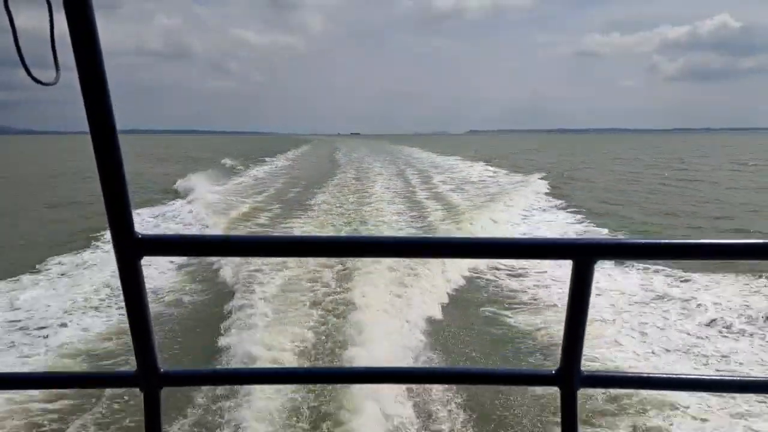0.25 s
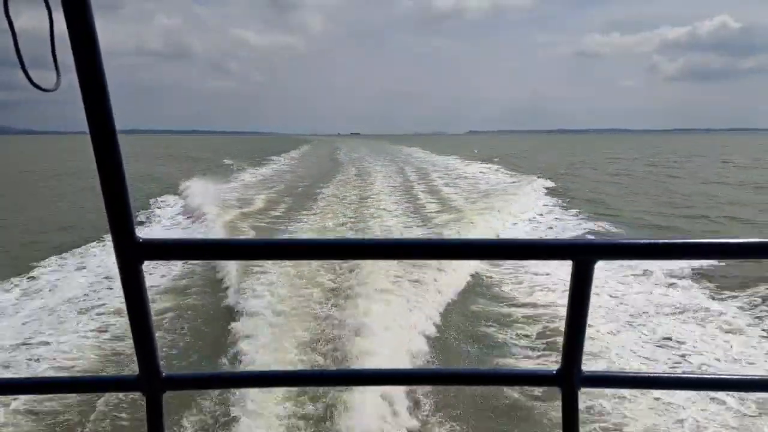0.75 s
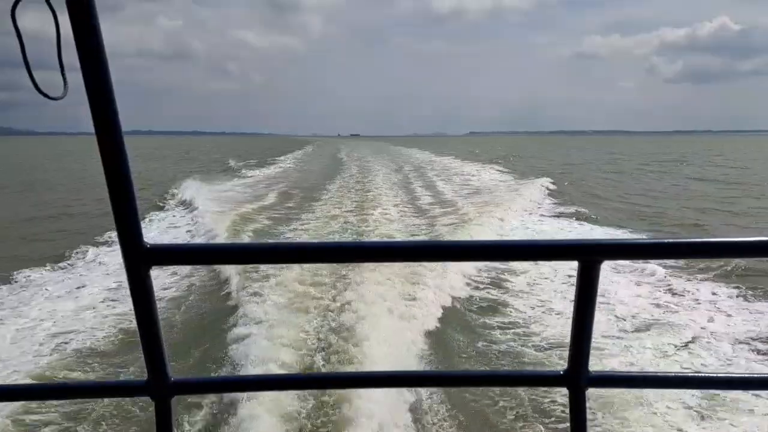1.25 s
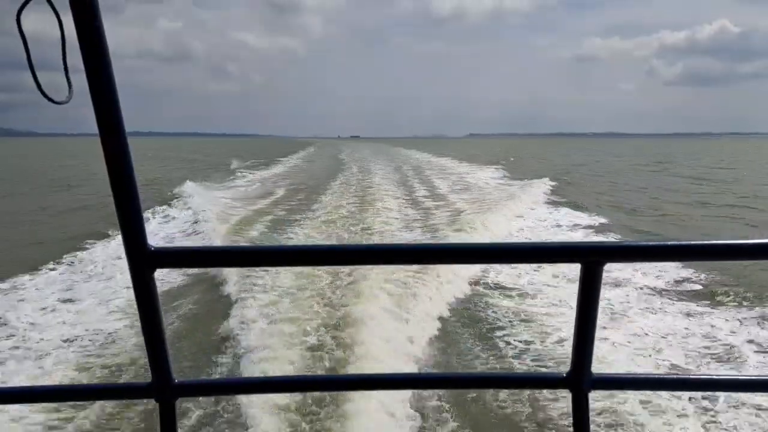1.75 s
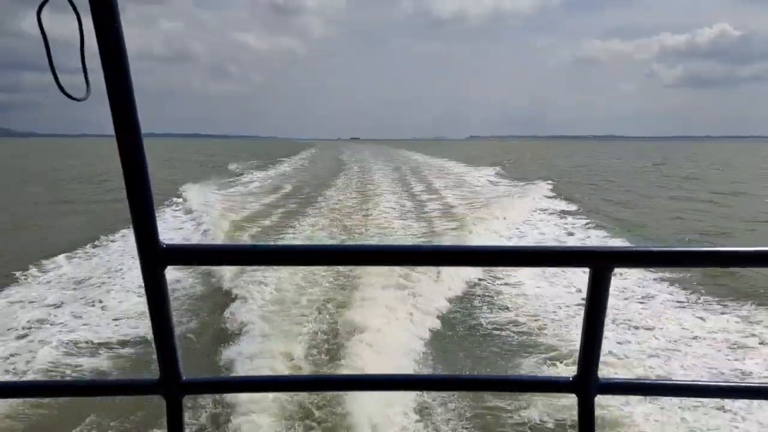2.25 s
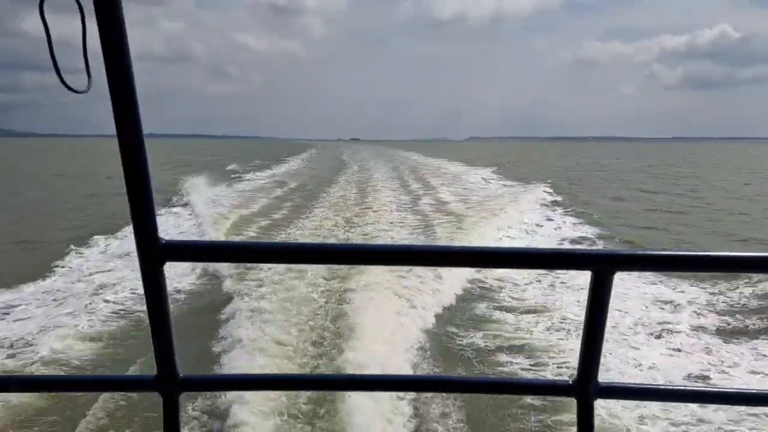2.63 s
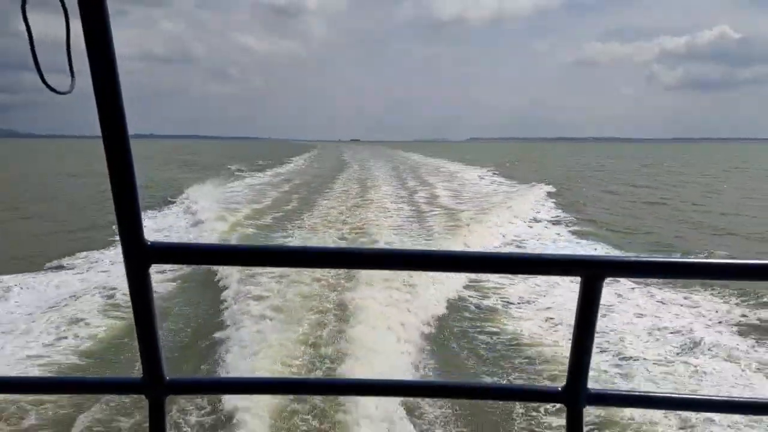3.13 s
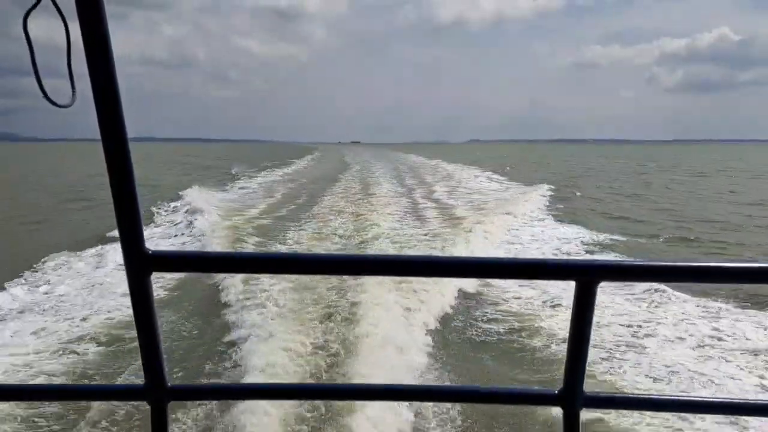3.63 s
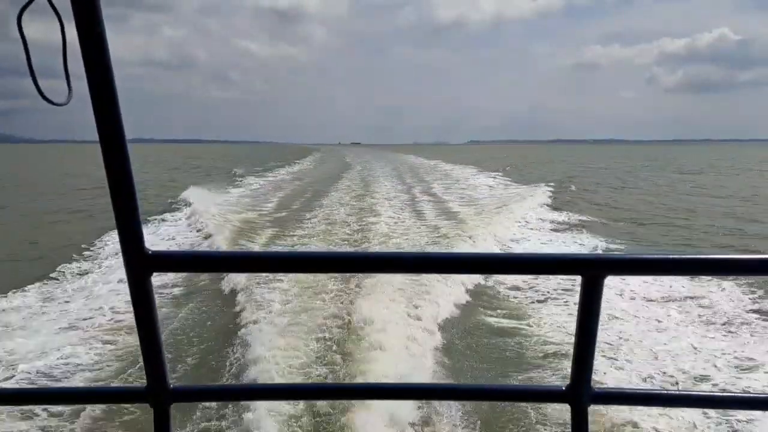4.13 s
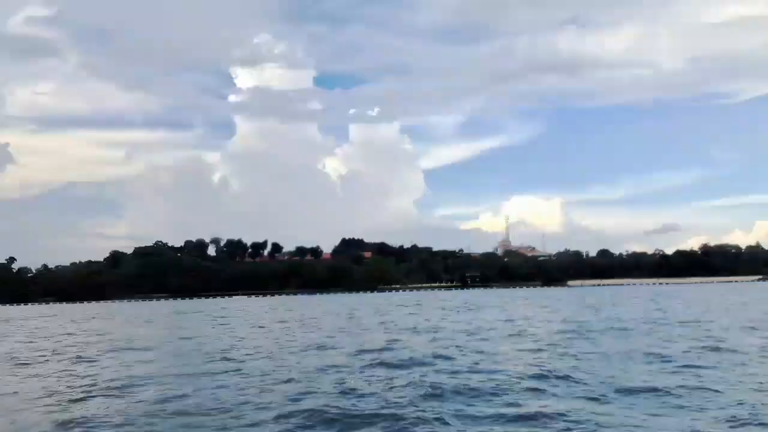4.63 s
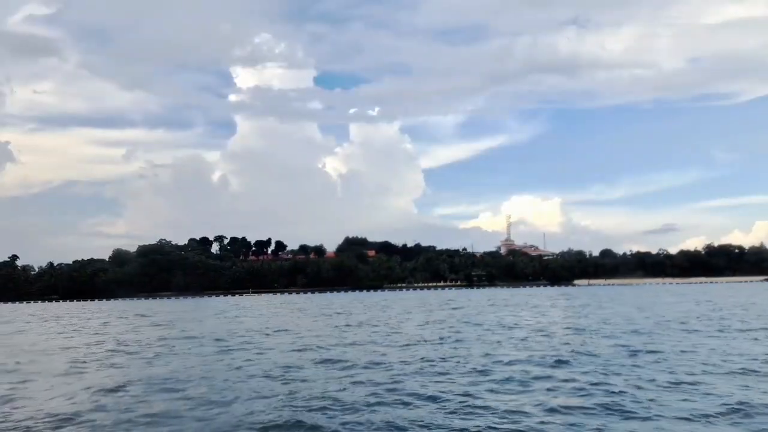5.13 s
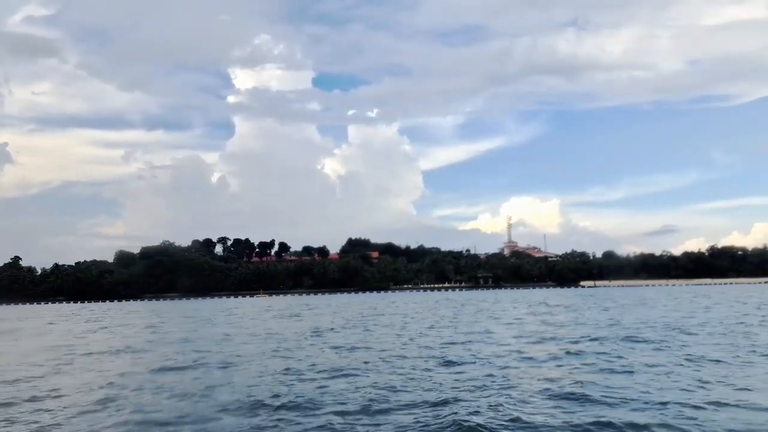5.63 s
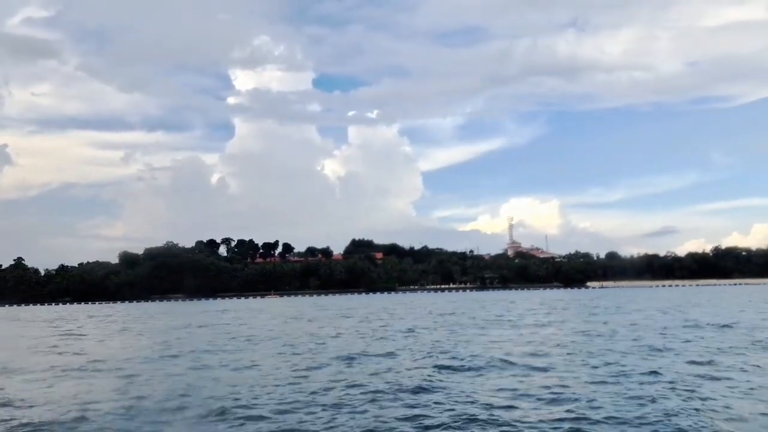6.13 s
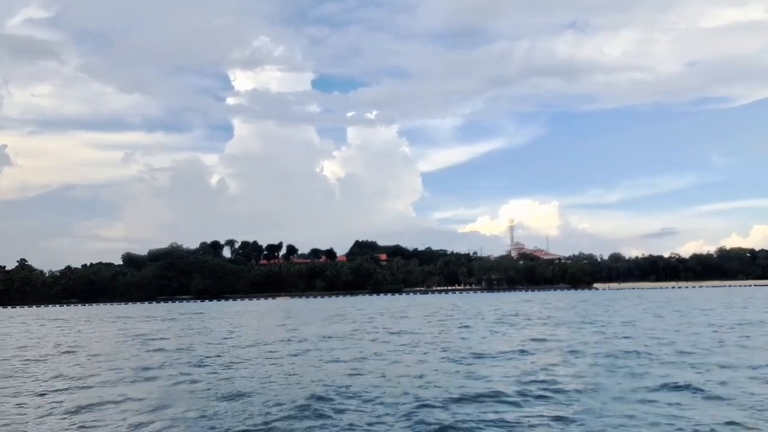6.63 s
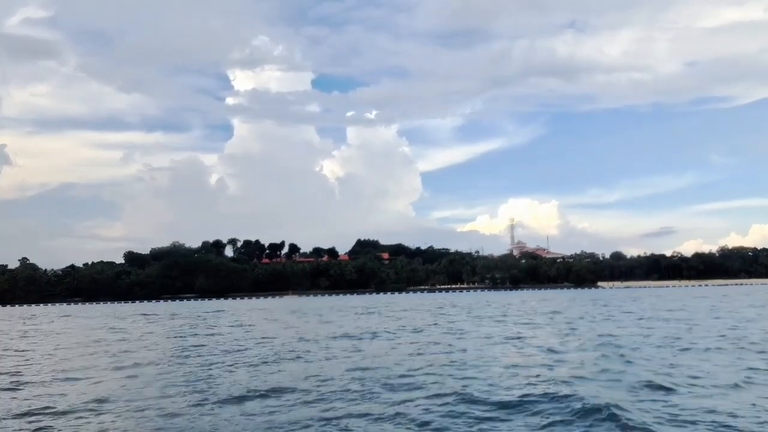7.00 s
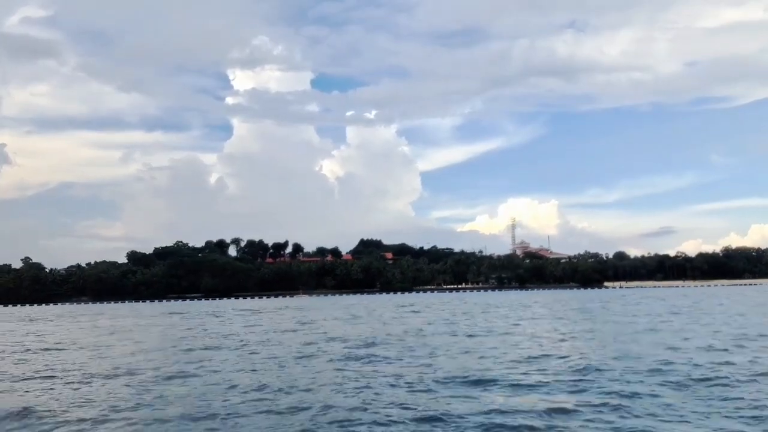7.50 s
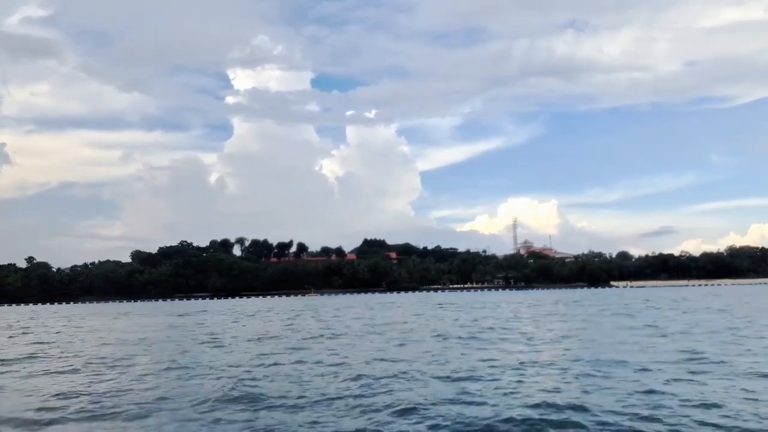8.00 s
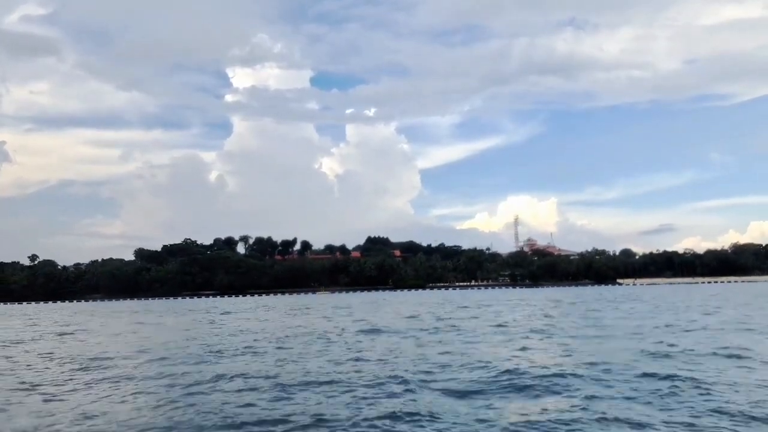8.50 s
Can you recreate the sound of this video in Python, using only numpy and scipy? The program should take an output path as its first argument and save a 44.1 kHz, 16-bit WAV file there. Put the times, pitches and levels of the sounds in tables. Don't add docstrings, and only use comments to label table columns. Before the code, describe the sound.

On an open deck, heavy engines pulse over churning wake, cut out briefly, then a barking exhaust drones on with gentle waves, drips and squeaks.

```python
import sys
import numpy as np
from scipy import signal
from scipy.fft import rfft, irfft, next_fast_len
from scipy.io import wavfile
from scipy.ndimage import uniform_filter1d, map_coordinates

SR = 44100
rng = np.random.default_rng(int(sys.argv[2]) if len(sys.argv) > 2 else 0)


def bounce(signal):
    frames = np.transpose(np.atleast_2d(signal))
    limited = np.clip(frames, -1, 1)
    pcm = np.round(limited * 32767).astype(np.int16)
    wavfile.write(sys.argv[1], SR, pcm)


def field_ratio(decibels):
    return 10 ** (np.asarray(decibels, dtype=float) / 20)


N = 385875


def unit(x):
    return x / np.sqrt(np.mean(x ** 2) + 1e-20)


def along(points, hz):
    f, v = np.transpose(points)
    return np.interp(np.log(hz + 1), np.log(f + 1), v)


def wobble(rate):
    knots = rng.standard_normal(int(N * rate / SR) + 4)
    return map_coordinates(knots, [np.arange(N) * rate / SR])


def swell(s, length):
    return np.sin(np.pi * np.clip((np.arange(N) / SR - s) / length, 0, 1)) ** 2


def filtered(x, response):
    m = next_fast_len(N + 8192)
    return irfft(rfft(x, m) * response(np.fft.rfftfreq(m, 1 / SR)), m)[..., :N]


def tilted(x, tilt):
    return filtered(x, lambda hz: field_ratio(np.outer([.5, -.5], along(tilt, hz))))


def rush(spectrum, alike, patchy_db):
    z = signal.stft(rng.standard_normal((2, N)), nperseg=512)[2]
    field = uniform_filter1d(rng.standard_normal(z.shape[1:]), size=8, axis=0)
    field = uniform_filter1d(field, size=10, axis=1)
    pair = signal.istft(z * field_ratio(patchy_db * unit(field)), nperseg=512)[1][:, :N]

    def mid_and_side(hz):
        turn = np.arccos(np.clip(along(alike, hz), -1, 1)) / 2
        return field_ratio(along(spectrum, hz)) * [np.cos(turn), np.sin(turn)]

    mid, side = filtered(pair, mid_and_side)
    return unit(np.array([mid + side, mid - side]))


def narrow(hz, width_hz):
    return unit(filtered(rng.standard_normal(N), lambda f: np.exp(-((f - hz) / width_hz) ** 2)))


def spray(level_db, surge, spectrum, alike, tilt):
    flicker_db = 0.26 * surge + 0.2 * wobble(25)
    return tilted(field_ratio(level_db + 3.5 + flicker_db) * rush(spectrum, alike, patchy_db=0.8), tilt)


def hull_roar(level_db, surge, spectrum, alike, tilt):
    return tilted(field_ratio(level_db + 0.44 * surge) * rush(spectrum, alike, patchy_db=1.0), tilt)


def exhaust_rumble(load, spectrum, alike, tilt):
    power = np.sum(field_ratio(2 * along(spectrum, np.arange(10, 1400))))
    level = load * field_ratio(10 * np.log10(power) + 1.5 * wobble(3.3))
    return tilted(level * rush(spectrum, alike, patchy_db=1.5), tilt)


def whine(tones):
    total = 0
    for hz, width, db in tones:
        pair = np.array([narrow(hz, width), narrow(hz, width)])
        total = total + field_ratio(db + 2.5 * wobble(1.9)) * pair
    return total


# (t/s, length/s, level/dB)
DRIPS = [
    (4.917, .12, -76),
    (6.229, .04, -67),
    (6.453, 0.066, -74),
    (6.94, 0.14, -64),
    (7.157, .045, -64),
    (8.319, .05, -66),
    (8.37, .08, -69),
    (8.612, 0.03, -64),
]
# (f/Hz, level/dB per Hz)
WET_DECK = [(3000, -55), (7000, -9), (9000, -0.5), (13000, -7.5), (16000, -13)]


def spatter():
    drops = sum(field_ratio(db) * swell(s, length) for s, length, db in DRIPS)
    return drops * field_ratio(5 * wobble(300)) * rush(WET_DECK, [(5000, .1)], patchy_db=0)


# (t/s, length/s, f/Hz, width/Hz, level/dB)
SQUEAKS = [
    (5.55, .15, 10300, 300, -76),
    (7.33, .3, 10250, 250, -73),
    (7.84, .33, 10300, 300, -73),
    (7.72, .5, 1765, 8, -57),
]


def squeaking_fitting():
    return sum(field_ratio(db) * swell(s, length) * narrow(hz, width) for s, length, hz, width, db in SQUEAKS)


def diesel(hz, wander, orders, in_step, pipe, flutter_db):
    crank = hz * (np.arange(N) / SR - in_step) + wander * wobble(1.5)
    total = 0
    for k, db in orders:
        level = np.sqrt(2) * field_ratio(db + flutter_db * wobble(4))
        total = total + level * np.sin(2 * np.pi * (k * crank + pipe[int(k)]))
    return total


# (engine cycles f/Hz, crank wander/cycles, [(multiple of the cycle, level/dB)])
STERN_DIESELS = [
    (15.362, 0.0028, [(3, -38), (4, -36.5), (6, -20), (7, -37.5), (8, -55.5), (9, -21.3), (10, -38), (11, -35), (12, -36), (13, -58.5), (14, -46.5), (15, -51.5), (28, -56)]),
    (13.588, 0.0035, [(3, -30.5), (5, -40), (6, -20), (9, -28), (11, -31.5), (14, -43), (15, -43.5), (18, -43.5), (21, -49.5), (27, -46.5)]),
    (15.501, .004, [(6, -26), (8, -33.3), (9, -25), (14, -53), (18, -48.5), (20, -45)]),
    (15.134, 0.011, [(2, -38), (5, -36), (6, -29), (7, -30), (13, -52.5)]),
]
# (shaft turns f/Hz, level/dB)
BLADES = [
    (15.362, -31.5),
    (15.501, -29.5),
]


def stern_engines():
    pipe = rng.random(64)
    engines = sum(diesel(*row, 2.139, pipe, flutter_db=1.5) for row in STERN_DIESELS)
    blades = sum(diesel(hz, 0.012, [(3, db)], 1.62, pipe, flutter_db=1.0) for hz, db in BLADES)
    return engines + blades


RAIL_IN_STEP, NEAR_HZ = 6.29, 17.356
# (engine cycles f/Hz, crank wander/cycles, [(multiple of the cycle, level/dB)])
RAIL_DIESELS = [
    (10.82, 0.0024, [(4, -40), (5, -37.5), (6, -17.5), (9, -24.5), (10, -33.5), (12, -26), (13, -45), (14, -26.5), (16, -35.5), (17, -43.5), (18, -36), (19, -43.5), (20, -43), (21, -54.5), (22, -46)]),
    (12.267, 0.0031, [(3, -32.5), (6, -21.5), (7, -40), (9, -27), (11, -36.5), (12, -36.5), (14, -41.5), (22, -47.5), (24, -47), (28, -50)]),
]
# (multiple of the cycle, level/dB)
NEAR_LOW = [(6, -24), (9, -20.5), (12, -46)]


def rail_engines(pipe):
    engines = sum(diesel(*row, RAIL_IN_STEP, pipe, flutter_db=.8) for row in RAIL_DIESELS)
    return engines + diesel(NEAR_HZ, 0.023, NEAR_LOW, RAIL_IN_STEP, pipe, flutter_db=2.5)


# (multiple of the cycle, level/dB over the bark)
NEAR_BARK = [(15, -6), (18, -1.5), (21, -3), (24, -17), (26.7, -12), (27, -18), (30, -19.5), (39, -19),
             (41, -25.5), (44.7, -23)]


def exhaust_bark(level_db, pipe):
    return field_ratio(level_db - 2.2) * diesel(NEAR_HZ, .006, NEAR_BARK, RAIL_IN_STEP, pipe, flutter_db=1.5)


def panned(x, db):
    return x * field_ratio([[db / 2], [-db / 2]])


def limited(x):
    return x / (1 + np.abs(x / .98) ** 8) ** (1 / 8)


def starved(x, holes, dips, dip_db):
    frame = 1024
    hz, _, z = signal.stft(x, SR, nperseg=frame)
    draw = rng.random((len(hz) // 3 + 1, z.shape[2] // 3 + 1))
    draw = draw.repeat(3, axis=0).repeat(3, axis=1)
    draw = draw * field_ratio(2.2 * np.resize(wobble(6)[::frame // 2], draw.shape[1]))
    kept = draw[:len(hz), :z.shape[2]] > along(holes, hz)[:, None]
    x = signal.istft(z * kept, SR, nperseg=frame)[1][:, :N]

    hz, t, z = signal.stft(x, SR, nperseg=128, noverlap=96)
    frames = t * SR / frame - .74
    joint = np.round(frames).astype(int)
    struck, centre = rng.random((2, joint.max() + 2))[:, joint]
    near = np.exp(-((frames - joint) / 0.19) ** 2) * (struck < dips)
    band = np.exp(-((hz[:, None] - 3500 - 10000 * centre) / 3200) ** 4)
    return signal.istft(z * field_ratio(dip_db * near * band), SR, nperseg=128, noverlap=96)[1][:, :N]


# (t/s, drone level/dB)
STERN_LOAD = [
    (0, -14.5),
    (.6, -16.5),
    (1.2, -12.7),
    (1.8, -13.8),
    (2.4, -14.5),
    (2.8, -13.3),
    (3.3, -11.8),
    (3.9, -14.8),
    (4.6, -14),
]
# (t/s, length/s, level/dB)
SWELLS = [
    (.2, .8, 1),
    (1.0, 1.5, 2),
    (2.8, .9, 1.8),
]


def stern_levels():
    t = np.arange(N) / SR
    load_db = np.interp(t, *np.transpose(STERN_LOAD))
    churn_db = sum(db * swell(s, length) for s, length, db in SWELLS)
    ebb_db = -4.5 * (t - 3.5).clip(0)
    roar_db = -29 + .3 * (load_db + 14) + churn_db + ebb_db
    return load_db, roar_db, -40.1 + .6 * churn_db


# (f/Hz, level/dB per Hz)
STERN_RUMBLE = [(10, -100), (20, -64.5), (28, -64.5), (40, -39), (60, -40.5), (85, -43), (120, -40),
                (170, -46.5), (240, -53), (340, -55.5), (480, -59.2), (700, -67), (1400, -110)]
STERN_ROAR = [(120, -30), (200, -3), (269, 0.5), (338, -6.5), (392, -3), (541, -13), (914, -11.5),
              (1300, -24), (1690, -48), (2860, -120)]
STERN_SPRAY = [(650, -8.5), (1100, -1.5), (1550, -3.5), (2600, -2), (2850, -7.5), (5740, -10.8),
               (8000, -16.7), (9450, -21.5), (12200, -14.8), (15600, -26.5)]
# (f/Hz, likeness -1 to 1)
STERN_ALIKE = [(60, 0.81), (130, 0.81), (290, 0.96), (640, 0.62), (1410, -0.21), (3100, 0.08),
               (6820, -0.11), (15000, 0.05)]
# (f/Hz, left minus right level/dB)
STERN_TILT = [(60, .5), (200, 2), (380, -1), (1290, -2.5), (2380, -6.5), (4400, -9), (6800, -14.5),
              (9500, -4), (15000, -3)]
# (f/Hz, width/Hz, level/dB)
STERN_TURBO = [(381, 4, -43), (7895, 15, -67), (7935, 15, -70)]
# (f/Hz, share 0-1)
STERN_HOLES = [(5000, 0), (7000, .01), (9000, .02), (13000, .005), (15500, .08)]


def stern():
    drone_db, roar_db, spray_db = stern_levels()
    load = field_ratio(drone_db + 13)
    surge = wobble(7)
    low = load * panned(stern_engines(), 0.94)
    low = low + exhaust_rumble(load, STERN_RUMBLE, STERN_ALIKE, STERN_TILT)
    low = low + hull_roar(roar_db - 3, surge, STERN_ROAR, STERN_ALIKE, STERN_TILT)
    hiss = spray(spray_db, surge, STERN_SPRAY, STERN_ALIKE, STERN_TILT)
    return starved(limited(low) + hiss + whine(STERN_TURBO), STERN_HOLES, dips=0.11, dip_db=-5.5)


# (t/s, length/s, level/dB)
RAIL_WAVES = [
    (4.88, .2, 3.5),
    (5.08, .12, -2.5),
    (5.45, .9, -2),
    (6.4, .5, 1),
    (6.95, .8, 1.5),
    (8.1, .6, 1),
]
# (t/s, length/s, level/dB)
BARK_LULL = (6.85, 1.15, -10)


def rail_levels():
    settling = np.clip(1 - (np.arange(N) / SR - 5.08) / .12, 0, 1)
    gain_db = 3.8 * settling
    settling_db = .6 * gain_db
    water_db = settling_db + sum(db * swell(s, length) for s, length, db in RAIL_WAVES)
    s, length, lull_db = BARK_LULL
    bark_db = -31 + lull_db * swell(s, length) + settling_db
    return -13.7 + gain_db, -29 + water_db, -51 + water_db, bark_db


# (f/Hz, level/dB per Hz)
RAIL_RUMBLE = [(10, -100), (20, -60), (28, -56.5), (40, -52), (60, -41.5), (85, -49), (120, -39.5),
               (170, -45.5), (240, -55), (340, -64), (480, -74), (700, -72.5), (1400, -110)]
RAIL_ROAR = [(200, -28.5), (280, -9), (310, -3), (360, -2), (385, -10), (480, -12), (550, -12.5),
             (600, -17), (700, -14.5), (860, -22), (960, -19.5), (1100, -22.5), (1700, -48), (2900, -120)]
RAIL_SPRAY = [(650, -29), (1100, -13), (1160, -11.5), (1260, 1), (1590, -0.5), (1850, -4.5), (2190, -3),
              (3560, -17), (5190, -12), (6410, -22), (7740, -18), (9450, -27.5), (10400, -25.5),
              (15600, -41.5)]
# (f/Hz, likeness -1 to 1)
RAIL_ALIKE = [(60, 0.82), (130, 0.86), (290, 0.77), (640, 0.26), (1410, -0.089), (3100, 0.011),
              (6820, -0.06), (15000, 0.17)]
# (f/Hz, left minus right level/dB)
RAIL_TILT = [(60, 3), (110, 1.0), (200, -0.5), (380, -2.5), (700, 2.5), (1290, -1.5), (2380, -8),
             (4400, -9.5), (8120, -1), (15000, 1.5)]
# (f/Hz, width/Hz, level/dB)
RAIL_TURBO = [(615, 12, -55), (810, 6, -60), (977, 5, -57), (988, 4, -56), (741, 8, -58), (1260, 25, -62),
              (5185, 12, -69), (5100, 20, -74), (4625, 25, -73)]
# (f/Hz, share 0-1)
RAIL_HOLES = [(8000, 0), (9000, .25), (11000, .25), (13500, .35), (15000, .5), (15700, .85)]


def rail():
    drone_db, roar_db, spray_db, bark_db = rail_levels()
    load = field_ratio(drone_db + 13)
    surge = wobble(7)
    pipe = rng.random(64)
    low = load * panned(rail_engines(pipe), 1.2) + exhaust_bark(bark_db, pipe)
    low = low + exhaust_rumble(load, RAIL_RUMBLE, RAIL_ALIKE, RAIL_TILT)
    low = low + hull_roar(roar_db - 4.5, surge, RAIL_ROAR, RAIL_ALIKE, RAIL_TILT)
    hiss = spray(spray_db, surge, RAIL_SPRAY, RAIL_ALIKE, RAIL_TILT)
    ship = starved(limited(low) + hiss + whine(RAIL_TURBO), RAIL_HOLES, dips=.5, dip_db=-11.5)
    return squeaking_fitting() + spatter() + ship


def scene():
    stern_end, rail_start = 4.6015, 4.8075
    t = np.arange(N) / SR
    after = (t - stern_end).clip(0)
    falling = field_ratio(-6 * np.clip(1 - (stern_end - t) / 0.0016, 0, 1))
    smear = rush([(150, -20), (400, 0), (4000, -8), (5000, -40)], STERN_ALIKE, patchy_db=3)
    smear = field_ratio(-45 - 900 * after) * (after < .018) * smear
    fade_in = .015 + .985 * np.clip((t - rail_start) / .014, 0, 1) ** 1.5
    return np.where(t < stern_end, falling * stern(), smear) + (t > rail_start) * fade_in * rail()


def low_pass(x):
    return signal.sosfilt(signal.butter(12, 15720, fs=SR, output="sos"), x)


def record(dry):
    return low_pass(dry)


dry = scene()
out = record(dry)
bounce(out)
```